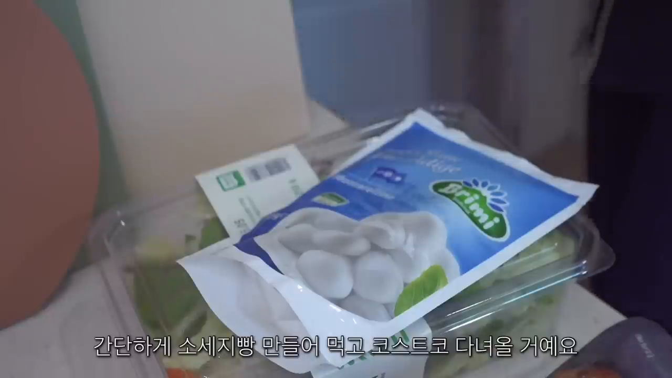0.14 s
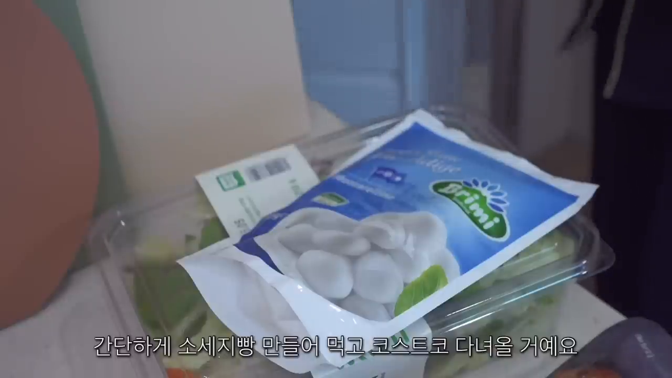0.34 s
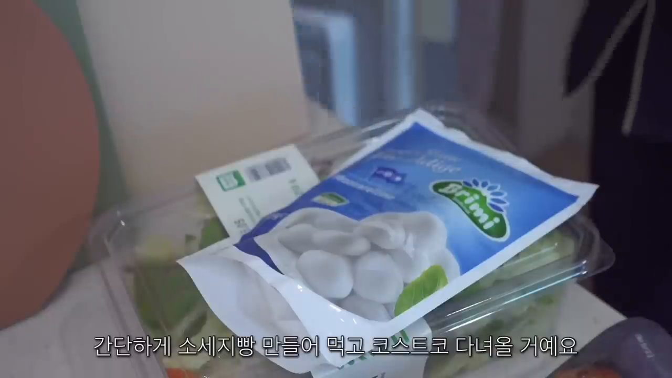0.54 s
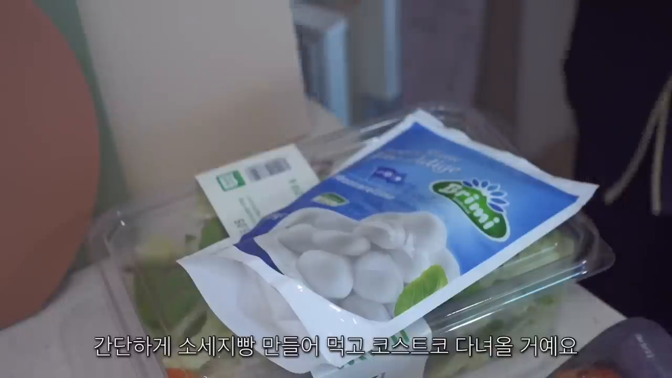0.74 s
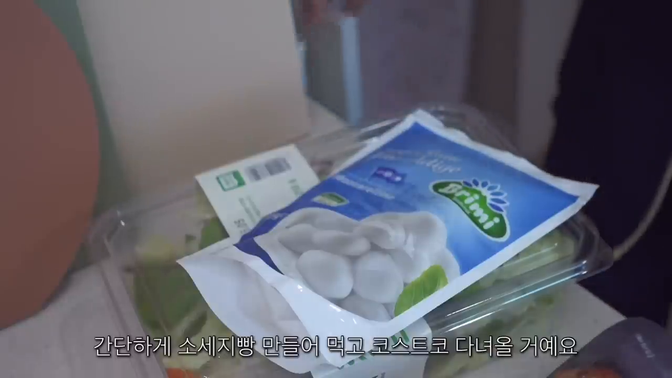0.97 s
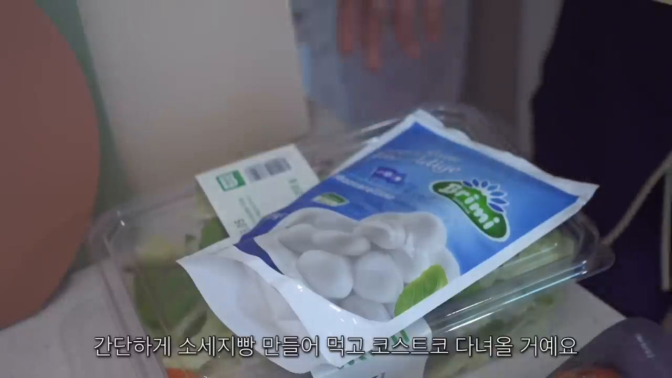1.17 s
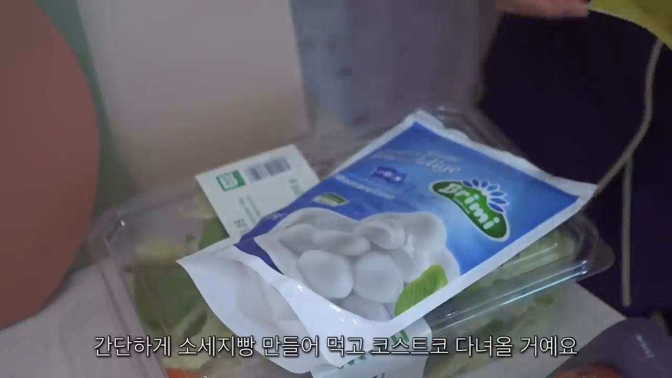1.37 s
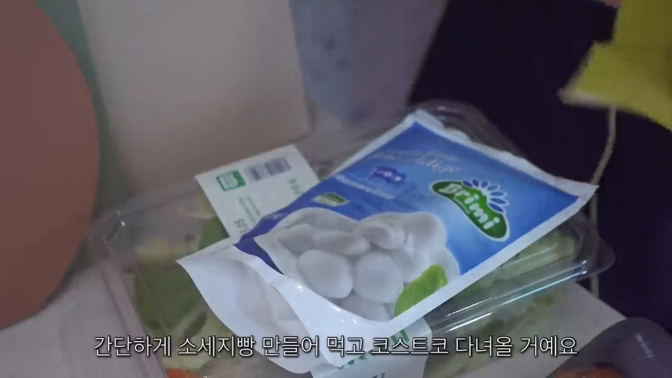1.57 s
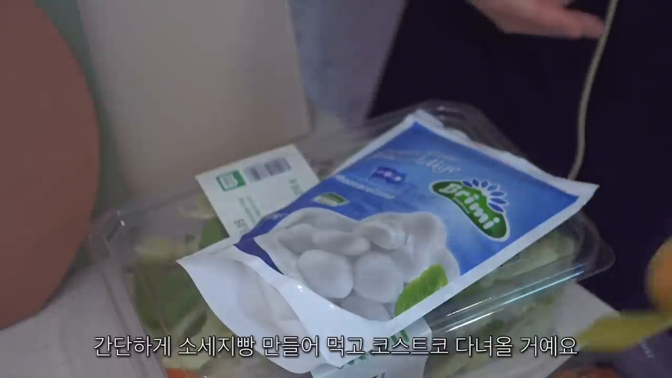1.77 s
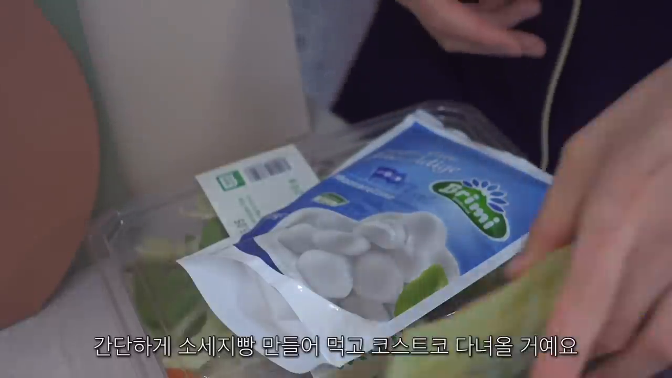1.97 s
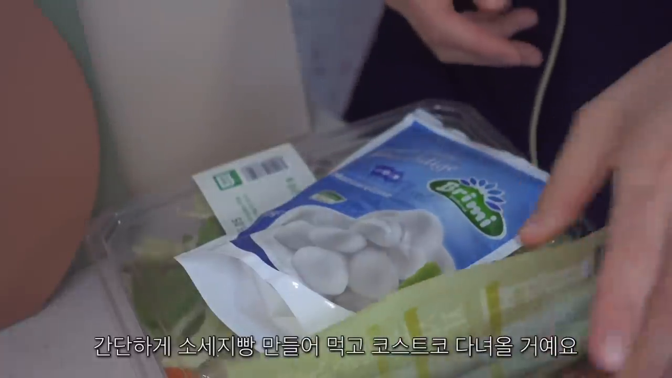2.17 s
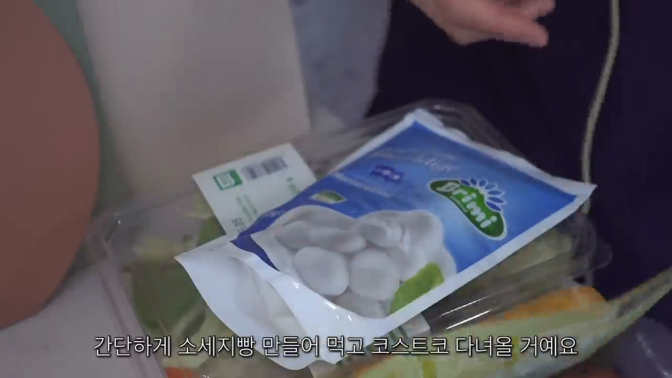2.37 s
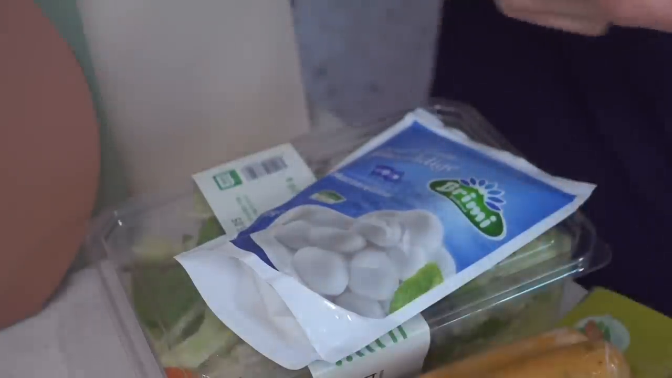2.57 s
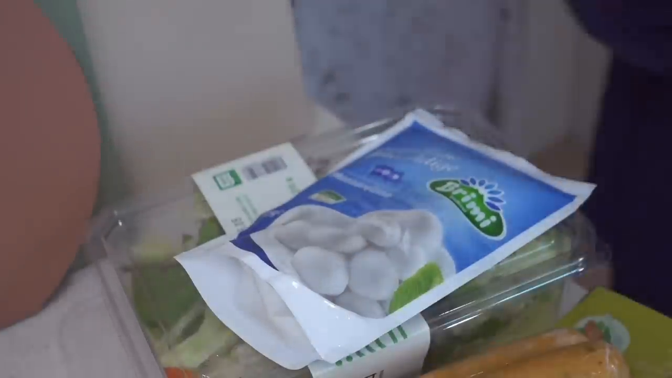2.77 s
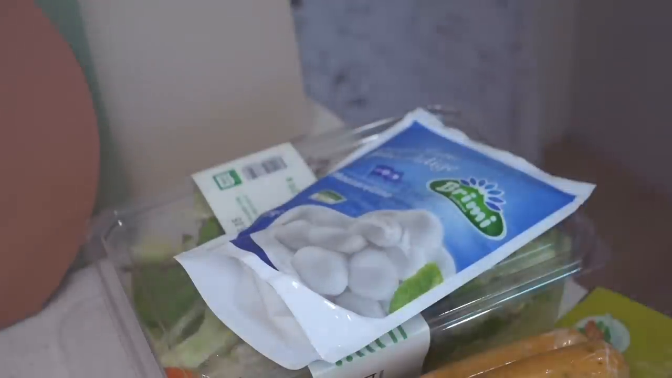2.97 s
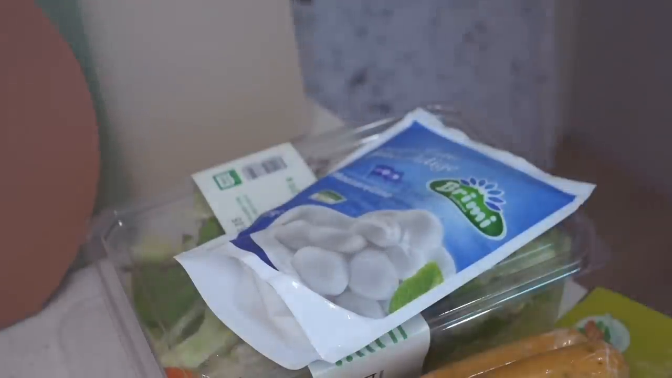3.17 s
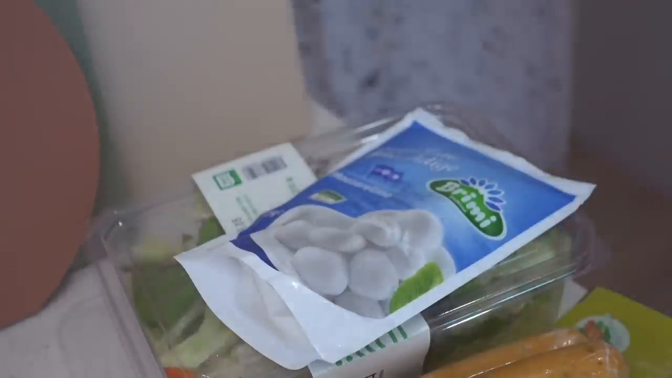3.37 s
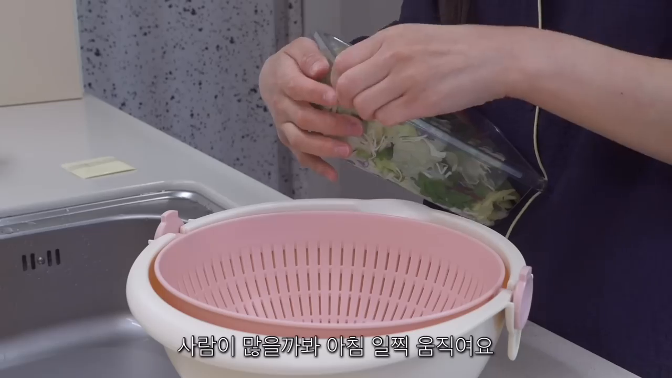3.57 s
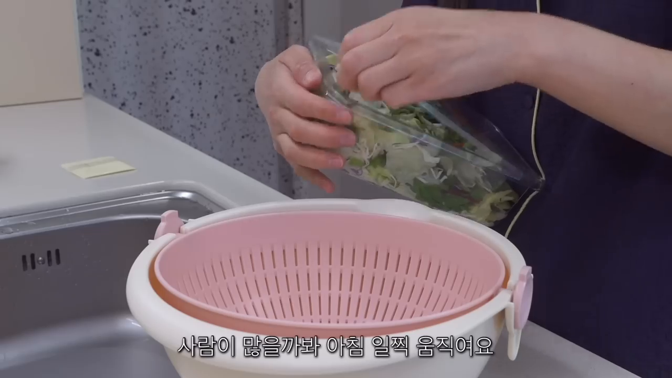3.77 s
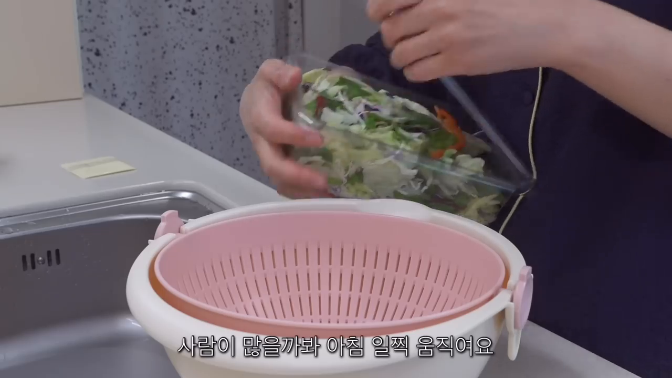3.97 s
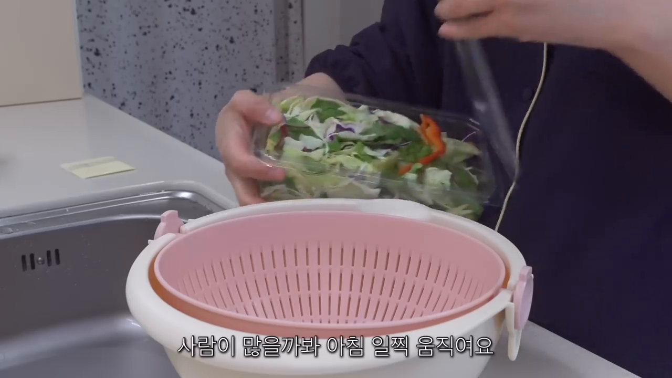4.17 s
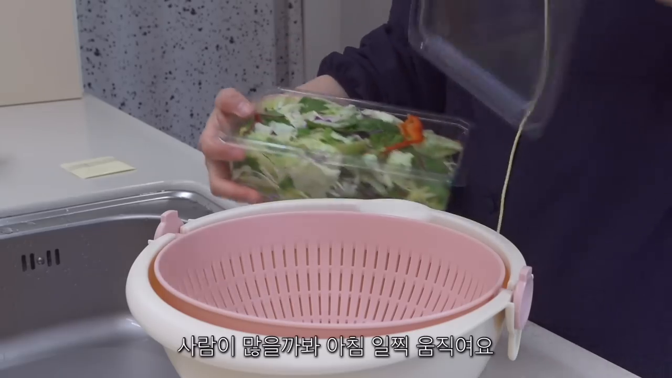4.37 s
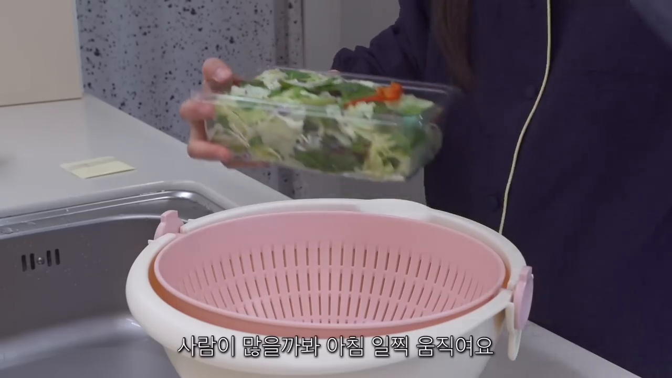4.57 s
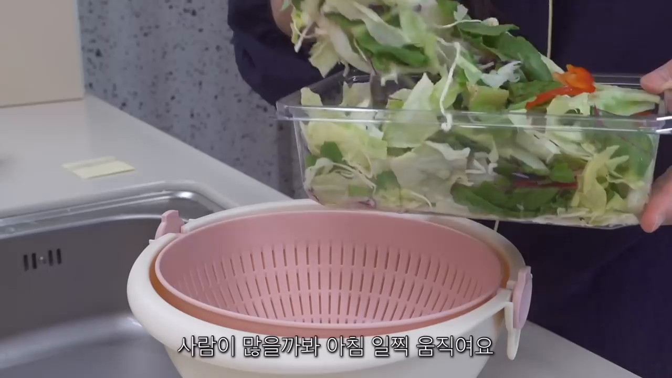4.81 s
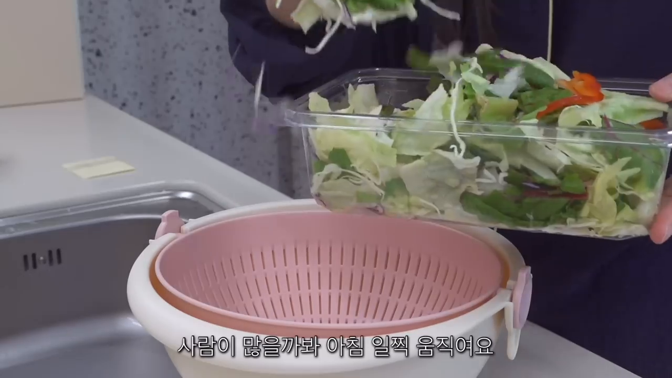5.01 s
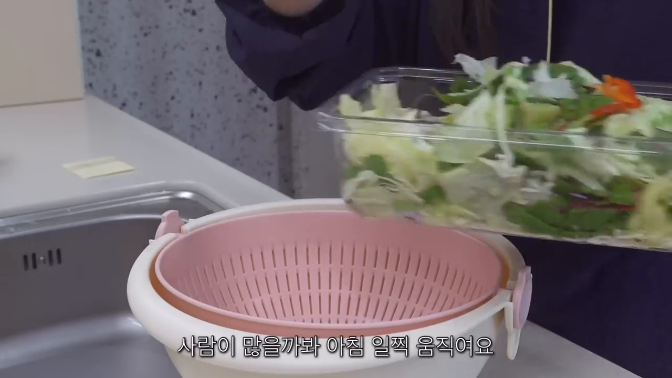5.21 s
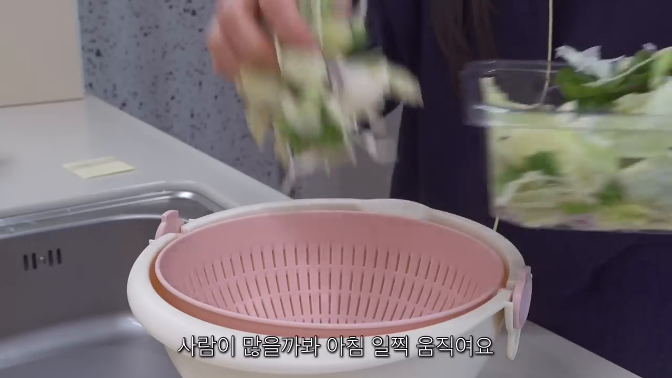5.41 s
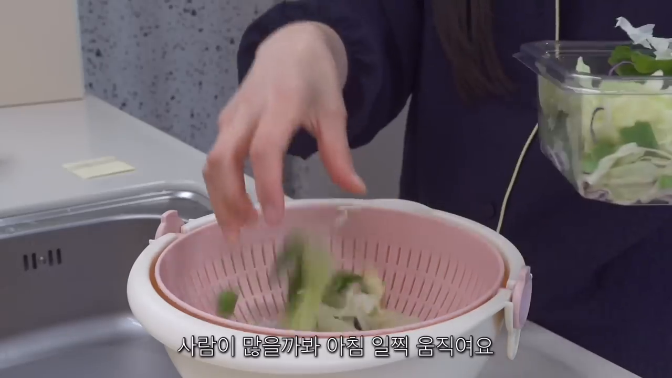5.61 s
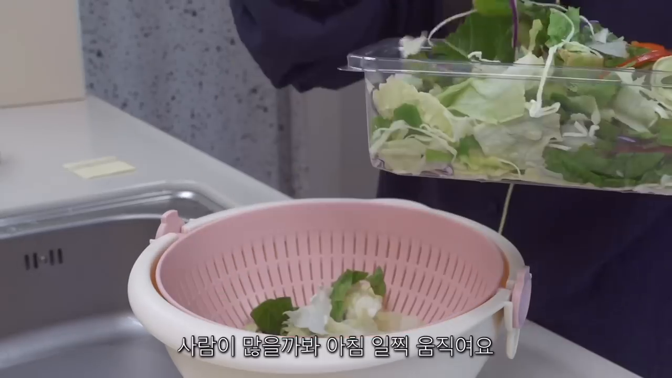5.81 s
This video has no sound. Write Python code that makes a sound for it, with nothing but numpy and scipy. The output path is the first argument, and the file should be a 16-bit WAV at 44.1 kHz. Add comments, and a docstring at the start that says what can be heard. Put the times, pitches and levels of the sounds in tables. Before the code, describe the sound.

A small, lightly reverberant kitchen heard up close in stereo, over soft hiss of drifting level and a barely audible hum. From 0 to 1.3 s there are only faint wrapper slides and distant small knocks. At 1.33 s a fridge door shuts: a padded thud with a low cabinet boom and slight rattle. At about 1.6 s a pack crinkles and taps; at 2.05 s a filled plastic pack slaps down very loudly, bright and crackly, setting boxes rattling, and at 2.5 s another lands, softer. Near quiet follows until 3.5 s. Then a thin plastic tub ticks, pops at 3.8 s with a hollow lid flutter and tiny high squeaks, and scrapes and clicks until about 4.4 s. From 4.7 s leaves rustle delicately with light plastic ticks. At 5.58 s a handful lands in a plastic colander with a crisp, softly hollow crunch, then a faint rustle fades.

```python
"""Kitchen: fridge, food packs, salad tub

Food is taken from a fridge, its door shuts and plastic packs slap onto a pile; a thin tub's lid pops and
peels off, leaves rustle and a handful lands in a colander. Blows are noise bursts through a material filter,
sliding and rustling are random grains, hollow things ring as damped sines, and squeaks are wavering sines.
Each sound has a short stereo room tail, over quiet hiss of drifting level and a faint steady hum."""
import sys
import numpy as np
from scipy import signal
from scipy.fft import rfft, irfft
from scipy.io import wavfile
from scipy.ndimage import uniform_filter1d, minimum_filter1d

SR = 44100
rng = np.random.default_rng(int(sys.argv[2]) if len(sys.argv) > 2 else 0)


def inscribe(sig):
    """Save sig as 16-bit PCM at rate SR to the path in sys.argv[1].

    A 1-D sig is mono; a 2-D sig holds one channel per row.
    Samples are clipped to [-1, 1] before scaling.
    """
    pcm = np.round(np.clip(np.atleast_2d(sig).T, -1, 1) * 32767)
    wavfile.write(sys.argv[1], SR, pcm.astype(np.int16))


N = 257984
SECOND = np.arange(SR) / SR  # time axis of one second


def packs():
    """Filled plastic packs slide, crinkle and slap down; every slap sets the boxes in the pile ringing."""
    # packs hit the pile: start_s, level_db, resonance_hz, ring_t60_s
    slap_rows = [(1.618, -22, 4680, .017), (1.659, -24, 3030, 0.038), (2.0518, 0.5, 1940, 0.011),
                 (2.068, -17, 1480, 0.084), (2.096, -7, 3160, 0.0063), (2.114, -18, 1880, 0.019),
                 (2.461, -24, 1080, 0.076), (2.487, -26, 960, 0.043), (2.5002, -9.5, 1750, 0.012),
                 (2.512, -24.5, 890, 0.04), (2.533, -28.5, 3000, 0.022), (2.6535, -34.5, 6260, 0.012)]
    # wrappers and sleeves slide: loudest_s, length_s, level_db, resonance_hz
    slide_rows = [(.065, 0.19, -46, 2400), (.40, 0.3, -52.5, 4500), (.945, 0.21, -49, 8500),
                  (1.25, 0.15, -41, 3600), (1.615, 0.13, -27.5, 4000), (1.775, 0.064, -41, 3370),
                  (2.045, 0.043, -16.5, 7060), (2.085, .08, -14.5, 2676), (2.30, 0.67, -46, 2200),
                  (2.45, 0.19, -39, 2600), (2.50, 0.053, -19, 7000)]
    # pack material response: freq_hz, relative_db
    pack_colour = [(35, -80), (60, -46.5), (268, -32), (607, -10), (698, -16), (842, -6.5), (1140, -11),
                   (1700, -5.5), (1860, -6.5), (3940, -11.5), (4320, -11), (14900, -21), (16000, -32)]
    # box modes in the pile: freq_hz, relative_db, t60_s
    pile_modes = [(871, -4.5, 0.091), (1300, -13.5, 0.37), (1526, 6.5, 0.11), (1775, -3.5, 0.073),
                  (1705, -3.5, 0.086), (1954, -4, 0.092), (2116, -9, 0.2), (3330, -2.5, .13),
                  (3170, -5, 0.11)]
    pile_re_slap_db = -18.5

    hits = [(s, db, hz, tilt(hz, tilt_db=1.06, bright_db=1.2), t60) for s, db, hz, t60 in slap_rows]
    out = blows(hits, pack_colour, peak_db=11.5, attack_s=0.0013, crack=0.75, ripple_db=-1.5)
    for start_s, db, _, _ in slap_rows:
        add(out, start_s, level(ring(pile_modes), db + pile_re_slap_db))
    slides = strokes(slide_rows, rise_share=0.33, grains_per_s=3800, tilt_db=-0.33, bright_db=1.6)
    out += crinkle(slides, pack_colour, peak_db=5, hiss=.3, buckling=.45, jerk_db=3.5, ripple_db=3.5)
    return room(out, wet_db=-6.5, side_db=-7.0, pan_db=0.4)


def fridge():
    """The door is pulled off its seal and things knock on the shelves; the door shuts and the cabinet booms."""
    # door meets its seal, shelves rattle: start_s, level_db, resonance_hz, tilt_db_per_octave, ring_t60_s
    door_rows = [(1.3292, -13, 1800, -1, 0.052), (1.341, -17.5, 1315, 0, 0.21), (1.376, -27, 483, -2, 0.43),
                 (1.428, -32, 6250, 0.5, .09), (1.442, -37, 543, -2, 0.11)]
    # door material response: freq_hz, relative_db
    door_colour = [(30, -44.5), (65, -1.5), (100, -12.5), (180, 1), (240, -7), (400, -9), (570, -2),
                   (1100, -4.5), (2000, -6.5), (3500, -10), (6300, -12.5), (16000, -34)]
    # cabinet modes: freq_hz, relative_db, t60_s
    cabinet_modes = [(67, -9.5, 0.3), (125.5, -3.5, 0.33), (183, -12, 0.071), (196.4, -7.5, 0.25),
                     (295, -3.5, 0.13), (424, -9, 0.27), (509, -5, 0.19), (577, 1.5, 0.24)]
    # knocks across the room: start_s, level_db, resonance_hz
    knock_rows = [(.032, -34.5, 2900), (.701, -40.5, 1360), (.724, -44, 1280), (.762, -38.5, 1380),
                  (1.088, -43, 2380), (1.283, -30.5, 1740), (1.751, -35, 3070), (1.845, -42, 3150),
                  (1.976, -39.5, 1700), (2.000, -36, 2920)]
    # knock material response: freq_hz, relative_db
    knock_colour = [(30, -43), (100, -26), (400, -26), (900, -3), (1900, 0), (4000, -10), (8000, -12.5),
                    (16000, -30.5)]
    open_s, open_db, shut_boom_db = .35, -58.5, -23.0

    door = blows(door_rows, door_colour, peak_db=4.0, attack_s=0.00039, crack=3, ripple_db=1.0)
    add(door, door_rows[0][0], level(ring(cabinet_modes), shut_boom_db))
    add(door, open_s, level(ring(cabinet_modes), open_db))
    hits = contacts(knock_rows, ring_s=.09, tilt_db=3.5, bright_db=7)
    knocks = blows(hits, knock_colour, peak_db=8, attack_s=.0007, crack=1.5, ripple_db=4.5)
    near = room(door, wet_db=-5.0, side_db=-6, pan_db=-0.4)
    return near + room(knocks, wet_db=1.5, side_db=-8, pan_db=-.5)


def tub():
    """The rim snaps free stud by stud, the lid drums, then scrapes and squeaks off; leaves drop into the tub."""
    # thin walls and rim snap; at 4.884 and 5.012 s leaves drop into the tub: start_s, level_db, resonance_hz
    tap_rows = [(3.548, -42, 2530), (3.638, -33.5, 3820), (3.764, -37, 3470), (3.781, -31, 7300),
                (3.801, -20.5, 2800), (3.807, -25.5, 1680), (3.884, -24, 5500), (3.976, -35, 9400),
                (4.042, -33.5, 5450), (4.098, -34, 8000), (4.178, -32.5, 4860), (4.249, -39, 8500),
                (4.322, -29, 6700), (4.712, -48, 7700), (4.763, -38, 7900), (4.807, -33.5, 9900),
                (4.849, -37.5, 3420), (4.884, -40, 970), (4.965, -44.5, 6740), (5.012, -46, 1020),
                (5.14, -32.5, 5030), (5.151, -31.5, 4970), (5.321, -54.5, 6550), (5.466, -43.5, 6500)]
    # fingers and lid rub along the rim: loudest_s, length_s, level_db, resonance_hz
    rub_rows = [(3.58, 0.064, -46.5, 1210), (3.70, 0.21, -44.5, 3200), (3.826, 0.044, -30, 1250),
                (3.893, 0.049, -25.5, 4800), (4.04, 0.29, -40.5, 5900), (4.18, 0.3, -36, 4600),
                (4.41, 0.26, -50, 5500)]
    # tub material response: freq_hz, relative_db
    tub_colour = [(30, -46), (100, -41), (250, -12.5), (450, -6.5), (1000, -2), (2100, 3), (2800, 2),
                  (3500, 2), (4300, 3), (5900, 2), (9000, 2.5), (16000, -4)]
    # walls and lid flex and drum, the last as leaves drop in: start_s, level_db
    drum_rows = [(3.568, -54), (3.647, -45.5), (3.805, -35.5), (3.826, -23.5), (3.846, -27), (3.885, -32),
                 (4.033, -41.5), (4.884, -59)]
    # tub modes: freq_hz, relative_db, t60_s
    tub_modes = [(102, -24, .15), (302, -10, 0.081), (442, 6, 0.059), (472, 5, 0.059), (593, 3.5, 0.061),
                 (738, 5, 0.048), (1090, -15, 0.038), (1306, -6, 0.048), (1600, -12, 0.029),
                 (2060, -18, 0.073)]
    # rim drags over the lid: start_s, level_db, pitch_hz, length_s
    squeak_rows = [(3.858, -30, 5980, 0.046), (3.872, -36, 5870, 0.035), (4.176, -31, 4730, 0.0098)]

    taps = tap_rows + strays(rub_rows, under_db=-3, spread_db=4, count=2)
    hits = contacts(taps, ring_s=.034, tilt_db=0, bright_db=1.5)
    out = blows(hits, tub_colour, peak_db=8, attack_s=.0004, crack=4.5, ripple_db=5.5)
    rubs = strokes(rub_rows, rise_share=0.42, grains_per_s=2400, tilt_db=-2, bright_db=3.0)
    out += crinkle(rubs, tub_colour, peak_db=0, hiss=.35, buckling=.45, jerk_db=2.5, ripple_db=3)
    for start_s, db in drum_rows:
        add(out, start_s, level(ring(tub_modes), db))
    for start_s, db, hz, length_s in squeak_rows:
        add(out, start_s, level(squeak(hz, length_s), db))
    return room(out, wet_db=-4.0, side_db=-6.5, pan_db=1)


def salad(clumps=4):
    """Crisp leaves rustle; a handful lands in ever lighter clumps that set the colander ringing."""
    # leaves are gathered, then fall: loudest_s, length_s, level_db, resonance_hz
    leaf_rows = [(4.79, 0.16, -43, 8500), (4.88, 0.27, -49, 6900), (5.03, 1, -56.5, 5430),
                 (5.15, .1, -48, 4400), (5.495, 0.15, -41, 7550), (5.585, 0.082, -20.5, 5200),
                 (5.655, 0.23, -39.5, 3500)]
    # leaf material response: freq_hz, relative_db
    leaf_colour = [(30, -52), (100, -33), (300, -6.5), (900, -12.5), (1400, -1), (4500, 3), (8500, 0),
                   (16000, -10)]
    # stalks strike the colander: start_s, level_db, resonance_hz
    stalk_rows = [(5.582, -22.5, 7300), (5.590, -19, 4500), (5.655, -41, 6000), (5.7405, -45, 5900)]
    # colander modes: freq_hz, relative_db, t60_s
    colander_modes = [(142, -11, 0.26), (252, -8, 0.062), (393, -9, 0.063), (632, -1.5, 0.19),
                      (688, -2, 0.25), (772, -0.5, 0.17), (1470, -3, 0.072), (1510, 12.5, 0.024)]
    land_s, land_db, clump_gap_s, clump_drop_db = 5.578, -39.5, 0.017, 0.5

    rustles = strokes(leaf_rows, rise_share=0.31, grains_per_s=4700, tilt_db=-1.7, bright_db=4.5)
    out = crinkle(rustles, leaf_colour, peak_db=0.5, hiss=0.47, buckling=0.27, jerk_db=6, ripple_db=0.5)
    hits = contacts(stalk_rows, ring_s=.006, tilt_db=-1.5, bright_db=0)
    out += blows(hits, leaf_colour, peak_db=13, attack_s=.0004, crack=1.5, ripple_db=2)
    for k in range(clumps):
        add(out, land_s + k * clump_gap_s, level(ring(colander_modes), land_db - k * clump_drop_db))
    return room(out, wet_db=-5, side_db=-9.0, pan_db=1.5)


def blows(rows, colour, peak_db, attack_s, crack, ripple_db):
    """Each blow is a sharp crack and a dense cluster of quickly dying sheet modes."""
    out, t = np.zeros(N), SECOND[:SR // 4]
    for start_s, db, hz, tilt_db, t60 in rows:
        decay = undb(-60 * t / max(t60, .003))
        force = rng.standard_normal(len(t)) * decay * (1 - np.exp(-t / attack_s))
        force[0] += crack
        add(out, start_s, level(body(force, colour, hz, tilt_db, peak_db, ripple_db), db))
    return out


def crinkle(rows, colour, peak_db, hiss, buckling, jerk_db, ripple_db, jerks_per_s=130):
    """Each movement swells and fades in jerks: tiny slips, a few much larger than the rest, and buckling facets."""
    out, t = np.zeros(N), SECOND[:28000] - .25  # t = 0 at the loudest moment
    for loudest_s, rise_s, fall_s, db, hz, tilt_db, grains_per_s in rows:
        sizes = undb(5 * np.minimum(rng.standard_exponential(len(t)), 3))
        happens = rng.random(len(t)) < grains_per_s / SR
        slips = happens * sizes * rng.choice([-1, 1], len(t))
        force = slips / slips.std() + hiss * rng.standard_normal(len(t))
        force = force + buckling * buckles(len(t), per_s=700)
        jerks = np.interp((t - t[0]) * jerks_per_s, np.arange(256), rng.uniform(-1, 1, 256))
        grains = body(force * undb(jerk_db * jerks), colour, hz, tilt_db, peak_db, ripple_db)[:len(t)]
        # 20 dB down one rise before and one fall after
        stroke_db = -20 * np.where(t < 0, (t / rise_s) ** 2, t / fall_s)
        add(out, loudest_s + t[0], grains / grains.std() * undb(db + stroke_db))
    return out


def buckles(length, per_s, t60=0.0072, count=600):
    """Small facets flip at random moments; each pings briefly at its own pitch."""
    when, pitch, size = rng.random((count, 3)).T[:, :, None]
    t = SECOND[:SR // 100]
    gaps = -np.log(when)
    starts = (np.cumsum(gaps, axis=0) * SR / per_s).astype(int)
    pings = np.sin(2 * np.pi * 1200 * 10 ** pitch * t) * undb(-14 * size - 60 * t / t60)
    out = np.bincount((starts + np.arange(len(t))).ravel(), pings.ravel(), length)[:length]
    return out / out.std()


def squeak(hz, length_s, wobble=0.018):
    """Plastic sticks and slips so fast that it sings, hoarse and on an unsteady pitch."""
    t = SECOND[:int(length_s * SR)]
    drift, grip = (np.interp(t, np.arange(128) / 1500, rng.standard_normal(128)) for _ in range(2))
    phase = 2 * np.pi * np.cumsum(hz * (1 + wobble * drift)) / SR
    return np.abs(grip) * np.sin(phase) * np.sin(np.pi * t / length_s)


def ring(modes):
    """Damped modes after one blow, each pushed one way or the other; the contact takes a moment to build."""
    swing = np.zeros(SR)
    for hz, db, t60 in modes:
        swing += rng.choice([-1, 1]) * undb(db - 60 * SECOND / t60) * np.sin(2 * np.pi * hz * SECOND)
    return swing * np.sin(np.pi / 2 * np.minimum(SECOND / 0.0035, 1)) ** 2


def body(x, colour, hz, tilt_db, peak_db, ripple_db, size=2048):
    """Causal material response: a broad local resonance, a hardness tilt, random sheet modes at each contact."""
    f = np.fft.rfftfreq(size, 1 / SR)
    octaves = np.log2((f + 50) / hz)
    sheet = np.interp(np.sqrt(f), np.linspace(0, 150, 90), rng.uniform(-1, 1, 90))
    db = at_hz(colour, f) + tilt_db * np.log2(np.maximum(f, 400)) + ripple_db * sheet
    db = db + peak_db * np.exp(-(octaves / .5) ** 2)
    # folding the cepstrum makes the response minimum-phase
    cepstrum = irfft(np.log(undb(db)))
    cepstrum[1:size // 2] *= 2
    cepstrum[size // 2 + 1:] = 0
    return signal.fftconvolve(x, irfft(np.exp(rfft(cepstrum))))


def tilt(hz, tilt_db, bright_db, middle_hz=3000):
    """Tilt in dB per octave: for positive bright_db, a harder, higher-pitched contact is brighter."""
    return tilt_db + bright_db * np.log2(hz / middle_hz)


def contacts(rows, ring_s, tilt_db, bright_db):
    """Blows on one material share a ring time; their resonance sets their tilt."""
    return [(s, db, hz, tilt(hz, tilt_db, bright_db), ring_s) for s, db, hz in rows]


def strokes(rows, rise_share, grains_per_s, tilt_db, bright_db):
    """A movement swells for a share of its length and fades for the rest; a louder one sheds more grains."""
    gentle_db, grain_doubling_db = -39, 16.5  # level at the given grain rate; rise that doubles it
    share, out = np.clip(rise_share, .1, .9), []
    for loudest_s, length_s, db, hz in rows:
        rate = grains_per_s * 2 ** ((db - gentle_db) / grain_doubling_db)
        rise_s, fall_s = share * length_s, (1 - share) * length_s
        out.append((loudest_s, rise_s, fall_s, db, hz, tilt(hz, tilt_db, bright_db), rate))
    return out


def strays(movements, under_db, spread_db, count):
    """Small snaps scattered at random through each movement, near its level and pitch."""
    return [(s + .5 * length_s * (when - .5), db + under_db + spread_db * size, hz * 2 ** (pitch - .5))
            for s, length_s, db, hz in movements for when, size, pitch in rng.random((count, 3))]


def room(x, wet_db, side_db, pan_db):
    """Direct sound plus a diffuse tail whose lows last longest and whose stereo width grows with frequency."""
    # reverberation: freq_hz, t60_s
    decay_points = [(80, 0.49), (260, 0.32), (700, 0.35), (1800, 0.29), (5000, 0.26), (13000, 0.3)]
    width_points = [(100, .1), (400, .5), (2000, 0.79), (12000, 1.08)]  # freq_hz, side_gain
    f, edges_hz = np.fft.rfftfreq(SR, 1 / SR), [0, 180, 450, 1100, 2800, 7000, SR]
    noise, tail = rfft(rng.standard_normal((2, SR))), 0
    for lo, hi in zip(edges_hz, edges_hz[1:]):
        centre_hz = np.sqrt(max(lo, hi / 4) * hi)
        band = irfft(noise * ((f >= lo) & (f < hi)), SR)
        mid, side = band * undb(-60 * SECOND / at_hz(decay_points, centre_hz))
        width = undb(side_db) * at_hz(width_points, centre_hz)
        tail = tail + mid + np.outer([1, -1], side) * width
    tail = tail * np.clip((SECOND - .002) / 0.001, 0, 1)  # starts after 2 ms
    tail *= undb(wet_db) / np.sqrt(np.sum(tail ** 2) / 2)
    wet = signal.fftconvolve(x[None], tail, axes=1)[:, :N]
    return (x + wet) * undb(np.array([[pan_db], [-pan_db]]) / 2)


def undb(db):
    """Decibels to gain."""
    return 10 ** (np.asarray(db) / 20)


def at_hz(points, hz):
    """Read (Hz, value) points on a log-frequency axis."""
    f, value = np.transpose(points)
    return np.interp(np.log(hz + 1), np.log(f), value)


def add(track, s, sound):
    """Mix a sound into a track at time s."""
    i = int(s * SR)
    sound, i = sound[max(-i, 0):], max(i, 0)
    track[i:i + len(sound)] += sound[:N - i]


def level(x, db, size=128):
    """Scale a sound so that its loudest stretch has this rms level."""
    return x * undb(db) / np.sqrt(uniform_filter1d(x * x, size, mode="constant").max())


def air():
    """Soft stereo room hiss of drifting level, with a faint mains hum."""
    # hiss spectrum: freq_hz, relative_db
    hiss_colour = [(18, -49), (30, -23), (81, -23.5), (118, -14), (210, -17.5), (239, -10.5), (319, -11),
                   (512, -7), (666, -8), (844, -4.5), (1390, -6), (1860, -4.5), (3060, -11.5), (13700, -19),
                   (16000, -22)]
    # hiss level drift: time_s, offset_db
    drift_points = [(0, 6.5), (.6, 4), (1.2, 7), (2.7, 7.5), (3.25, 2), (3.55, 6.5), (5.4, 0.5),
                    (5.85, 6.5)]
    side_points = [(100, -9.5), (1000, -7), (4000, -5.5), (12000, -9.5)]  # freq_hz, side_re_mid_db
    hiss_db, hum_db, hum_hz = -60.5, -86.5, 120

    f, t = np.fft.rfftfreq(N, 1 / SR), np.arange(N) / SR
    mid, side = rfft(rng.standard_normal((2, N))) * undb(at_hz(hiss_colour, f))
    mid, side = irfft(mid, N), irfft(side * undb(at_hz(side_points, f)), N)
    gain = undb(hiss_db + np.interp(t, *np.transpose(drift_points)))
    hiss = (mid + np.outer([1, -1], side)) / mid.std() * gain
    return hiss + undb(hum_db) * np.sin(2 * np.pi * hum_hz * t)


def scene():
    """Everything in the kitchen."""
    return packs() + fridge() + tub() + salad() + air()


def record(dry):
    """The recorder drops the deepest bass, holds down peaks with a very fast limiter and cuts the top."""
    thin = signal.sosfilt(signal.butter(3, 52, "high", fs=SR, output="sos"), dry)
    gain = .98 / np.maximum(np.abs(thin), .98)
    gain = uniform_filter1d(minimum_filter1d(gain, size=25), size=25)
    return signal.sosfilt(signal.ellip(10, .2, 70, 16000, fs=SR, output="sos"), thin * gain)


dry = scene()
out = record(dry)
inscribe(out)
```